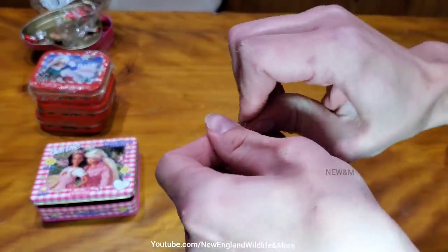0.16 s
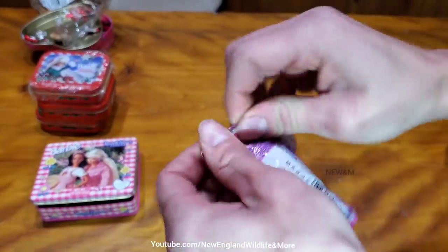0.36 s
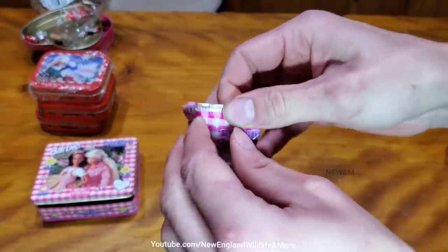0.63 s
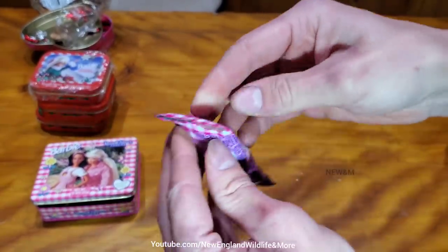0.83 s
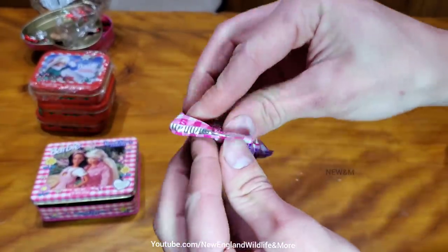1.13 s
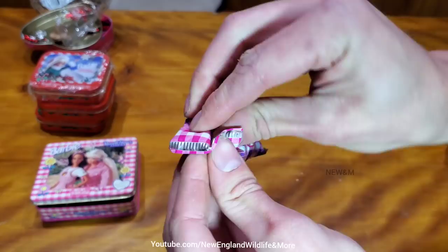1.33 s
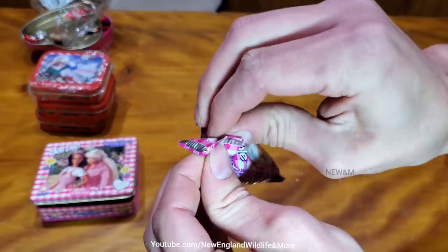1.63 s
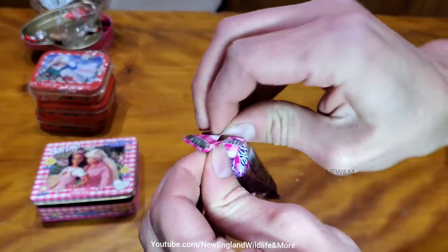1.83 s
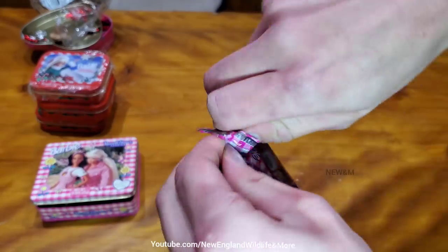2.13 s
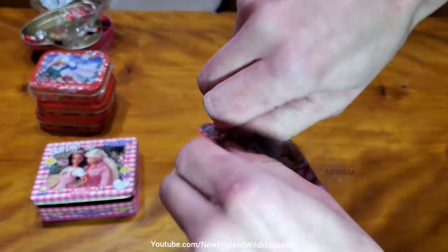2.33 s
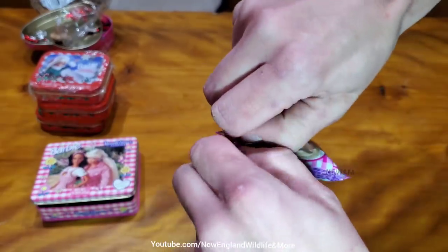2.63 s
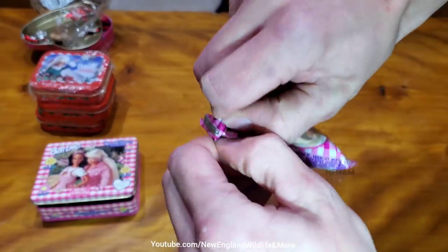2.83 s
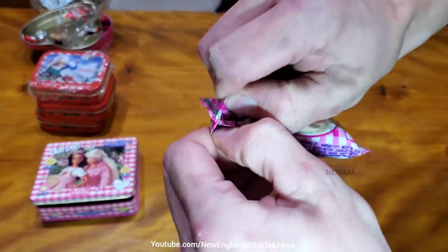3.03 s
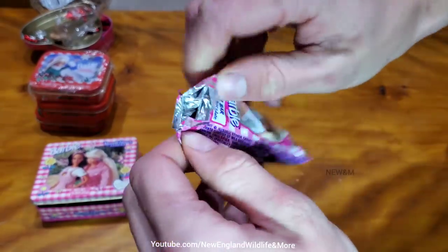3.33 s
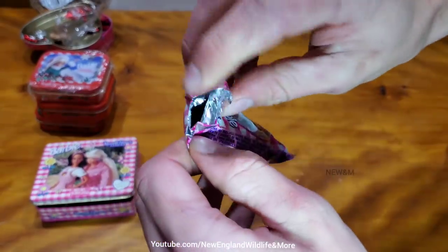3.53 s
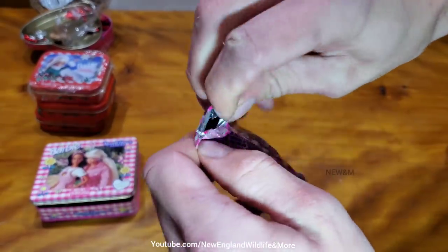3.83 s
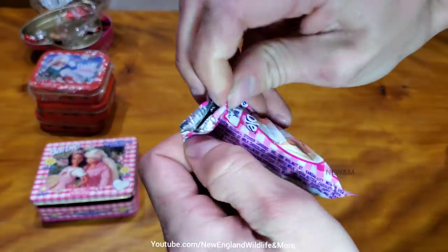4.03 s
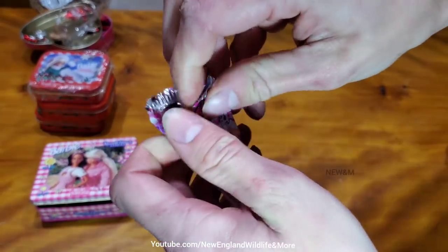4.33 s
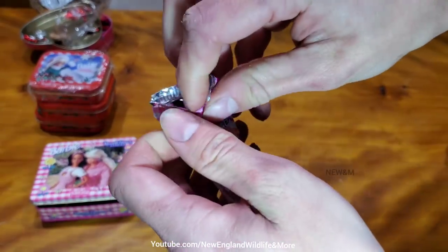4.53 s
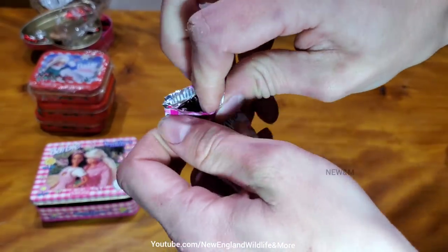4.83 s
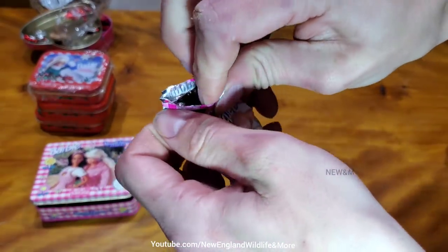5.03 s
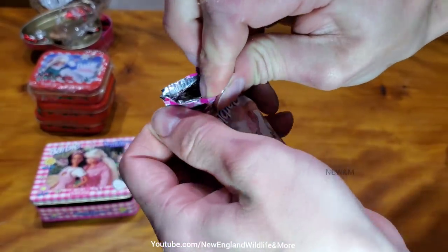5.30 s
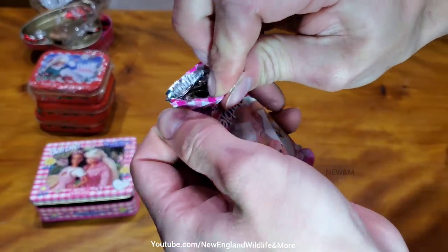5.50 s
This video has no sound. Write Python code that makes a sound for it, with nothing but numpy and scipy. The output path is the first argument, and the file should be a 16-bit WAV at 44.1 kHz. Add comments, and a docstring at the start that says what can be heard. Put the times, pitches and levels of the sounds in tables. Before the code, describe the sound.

Fingers crinkle and tear a foil-lined candy wrapper up close, with dry irregular crackles, a sharp rip midway, then lighter rustling in a quiet room.

```python
"""Over a wooden table in a small quiet room, fingers crinkle and tear a foil-lined candy wrapper near a stereo mic.
Snaps and a dense rustle of small creases share one buckle model: noise bursts (crack, pop, treble) and a damped ring.
Each squeeze drives the rustle and a dull rub of filtered noise; hand bumps on the table are damped 100 Hz sines.
The room answers with decaying noise tails; behind lie shaped room-tone noise, unsteady hum sines and a 57 Hz drone."""
import sys
import numpy as np
from scipy import signal
from scipy.fft import rfft, irfft, next_fast_len
from scipy.io import wavfile
from scipy.ndimage import map_coordinates

SR = 44100
rng = np.random.default_rng(int(sys.argv[2]) if len(sys.argv) > 2 else 0)


def ratio_of_db(decibels):
    """Turn decibels (scalar or array-like) into linear amplitude factors; 0 dB maps to 1."""
    return 10 ** (np.asarray(decibels, float) / 20)


def to_wav(s):
    """Save 16-bit WAV."""
    ch = np.atleast_2d(s).T  # columns
    pcm = np.round(np.clip(ch, -1, 1) * 32767)  # PCM
    wavfile.write(sys.argv[1], SR, pcm.astype(np.int16))


N = 249606

# loud creases: t/s, crack level/dB, panel f/Hz, pop level/dB re crack, treble level/dB re crack
SNAPS = [(.0036,-18.5,1910,-2,-22),(0.0376,-35,2960,-7,-21),(.1621,-47.5,4300,-2.5,1),(.216,-38.5,4400,-15,-26),(0.2295,-40,1930,-3,3.5),(.2403,-36,2020,-7,4.5),
         (.265,-33.5,3060,-28,2.5),(.289,-36.5,3980,-6.5,-7),(0.3777,-36,3040,-4.5,1.5),(0.41,-30,2960,-2,5),(.429,-24.5,1370,-5,-7),(0.5035,-26,1350,-5,-5),
         (0.5115,-26.5,1030,-1,4.5),(.534,-26,2770,-4,3),(0.6326,-24.5,4300,-15,-43),(0.6515,-31,1540,2.5,5),(0.6643,-28.5,3900,-5,-4.5),(0.7015,-34,4200,-6.5,-16),
         (0.7177,-33.5,3400,-7.5,1.5),(0.7456,-31.5,3120,-1.5,-19),(0.767,-25.5,3280,-6,-6),(.77,-26.5,3380,-8,0),(0.7782,-25.5,2080,-19,-6),(0.8018,-23,2010,-10.5,-6),
         (0.8306,-34,3240,-25,-2),(0.8531,-21.5,3870,-12.5,-7.5),(0.8915,-33,1990,1,-16),(.921,-26,3070,-13,-1),(0.9621,-23.5,1800,-5.5,-4),(0.9704,-25,1830,-2,-1.5),
         (0.984,-27.5,2970,-16,-15),(0.9927,-28.5,3230,-8,5.5),(1.0527,-27.5,2970,-7,-3.5),(1.071,-31.5,1800,-2.5,-14),(1.09,-21.5,3450,-8,-5.5),
         (1.1222,-43.5,1650,1,16),(1.1621,-22.5,3030,-19,-9),(1.205,-30.5,3300,-11,2),(1.294,-30,3900,-26,-20),(1.3491,-29.5,3360,-18,-28),
         (1.409,-33,3260,-8.5,-28),(1.4337,-30,1270,-1.5,-4),(1.4431,-28.5,3640,-9,-8),(1.4578,-28.5,3230,-1,-21),(1.5317,-21,3650,-26,-27),
         (1.543,-24,3420,-15.5,-2),(1.5882,-29,1390,-6.5,-8),(1.5947,-25.5,3460,-5.5,-2),(1.6222,-27,3900,-12,-5),(1.636,-24.5,3900,-3,-19),(1.6893,-25.5,2990,-10,-2),
         (1.695,-24,4460,-19.5,3),(1.7718,-45,3570,-3,3),(1.784,-32.5,4300,-16.5,-11),(1.898,-32.5,1710,-5.5,3.5),(1.9279,-30,1060,7.5,-2),(1.9742,-27,3780,-9,-20),(1.993,-22,3360,-20,-15),
         (2.04,-31.5,3260,-9.5,-22),(2.13,-24,3400,-12,-2.5),(2.1669,-29,1790,1,-28),(2.1825,-26.5,3150,-15,-7),(2.272,-35,3130,-4.5,4.5),
         (2.3107,-27,4260,-8.5,-1),(2.315,-33.5,1590,-7,0),(2.3449,-33.5,1600,-4.5,-1.5),(2.4237,-39.5,4420,-9.5,-26),(2.4804,-37.5,3100,-11,-3),(2.605,-46,3630,-37,-27.5),(2.679,-62,3600,-17,-1),(2.733,-24,3600,-7,-34),
         (2.7446,-17,4450,-14.5,-34),(2.818,-21.5,4330,-43,-1.5),(2.855,-25.5,2670,-8,0),(2.8745,-33,4010,-6,3),(2.9339,-41,4170,-22,2),(2.946,-37,4240,-24,10.5),
         (2.9611,-34.5,3930,-18,2),(2.976,-36,4140,-16,5),(2.988,-34,3900,-25,2),(2.999,-18,3150,-23,-8),(3.0022,-34.5,3800,-21,8.5),(3.0107,-35,4100,-26,8),
         (3.0589,-33.5,4440,-6.5,-1),(3.0766,-31,1890,-5,-23),(3.097,-22,1260,-7,3.5),(3.1068,-18,2870,-7,-6),(3.1187,-13.5,4300,-5,-26),
         (3.1242,-16,2280,0,-5),(3.1283,-20.5,1480,-2.5,-1.5),(3.153,-17.5,3600,-13,-22),(3.1963,-20,1996,-10,-3.5),(3.2117,-43,3480,-11,-8),(3.231,-37.5,3250,-5,11.5),
         (3.256,-20,1480,-3,-7),(3.2646,-25.5,3160,-25,-5),(3.3376,-28,4400,-9,-4),(3.378,-41,915,6.5,-10),(3.3949,-27,800,-6,-3.5),(3.4157,-29.5,4000,-16,-5),
         (3.445,-46,900,4,-12),(3.4552,-35.5,3420,-6,-2.5),(3.4744,-28.5,3370,-13,-1.5),(3.51,-38,980,-1.5,-17),(3.5223,-41,1150,0,-10),(3.595,-45,780,-7,-32),(3.6165,-27.5,1360,1,-8),(3.686,-37,1500,0.5,-20),
         (3.7052,-35.5,1280,5,-4),(3.791,-34.5,1750,-3.5,-3),(3.8171,-37.5,3020,-26,3),(3.826,-29,2900,-30,-14),(3.864,-34.5,3060,-25,4.5),(3.876,-30.5,4200,-34,-9),
         (3.888,-25,4000,-13,5.5),(3.915,-36.5,1200,1.5,-8),(3.931,-32,4250,-8,2.5),(3.938,-26,4300,-1.5,-18),(3.944,-24.5,1130,-15.5,-15),(3.9862,-27,1010,-7.5,-7.5),(4.0152,-34,1480,0,-0.5),
         (4.0372,-25.5,4070,-6,0.5),(4.042,-28,3630,-6,-7),(4.052,-29.5,2930,-10,-2.5),(4.1006,-39,1310,6,2),(4.113,-37,3300,-24,11.5),(4.1255,-35,1350,3.5,-1),
         (4.1465,-27.5,3180,-22,5),(4.1503,-29,3260,-6,-8),(4.1672,-24,1690,0.5,-6),(4.1726,-27,2300,-26,-26),(4.212,-33,3220,-16,1),
         (4.235,-26.5,3070,-4,-11),(4.3277,-37.5,3370,-8,-5),(4.3547,-34.5,1940,-12,-20),(4.3656,-40,3750,-1,-5),(4.437,-33,1860,-5,-2.5),(4.5126,-47,1660,3.5,-19),
         (4.553,-37.5,3020,-4,0),(4.615,-33,1370,-4,-13),(4.652,-30.5,3220,-9.5,-3.5),(4.6792,-31.5,1650,-3,0),(4.6859,-32,1040,1,9),(4.7333,-37.5,1330,0,6.5),
         (4.7601,-38.5,1860,7,-9),(4.7642,-40,2900,0,-19),(4.794,-33,3350,-13,6),(4.9054,-43.5,1390,3,5.5),(4.946,-34.5,2210,-20,-9),(4.966,-46.5,710,11,-15),
         (4.9832,-43,3960,-6,8.5),(4.9908,-40,1540,-1,3),(5.0763,-40.5,3860,-15,8),(5.091,-35.5,1580,-6,3.5),(5.1316,-32.5,1860,-5,5.5),(5.1654,-33.5,1900,2.5,3.5),
         (5.2083,-49.5,1410,18.5,-22),(5.2213,-27.5,4070,-5.5,5),(5.238,-34,3600,-4,-20),(5.2835,-26.5,2010,2,-1.5),(5.476,-38,2010,-5.5,-2),
         (5.5945,-48,2710,0,-7),(5.63,-42,1490,6,8.5),(5.6461,-32,1500,-6,-4)]
# finger squeezes: peak t/s, rustle level/dB, fade/(dB/s), foil hiss level/dB re rustle, dull rub level/dB re rustle
SQUEEZES = [(0.0, -45.5, 247, 7.5, -16), (.173, -52.5, 333, -25, -10), (.24, -55, 140, -19, -18),
            (.278, -49.5, 400, 7, -22), (.35, -52, 200, -22, -2), (0.418, -26.5, 171, -9, -8.5),
            (.5, -35.5, 205, -17, -4), (0.546, -27, 410, -10, -12), (0.652, -29.5, 315, -10.5, -8),
            (0.777, -32.5, 420, -7, -4), (.898, -40, 200, -18, -5.5), (0.979, -31, 207, -4.5, -18),
            (1.087, -33, 285, -8, -41), (1.21, -33, 116, -4, -16), (1.31, -43, 124, -5, -12),
            (1.448, -33.5, 146, -8.5, -18), (1.56, -33.5, 102, -3, -31), (1.637, -30.5, 400, -4, -41),
            (1.753, -64, 217, -25, -21), (1.922, -30, 139, -5, -29), (1.999, -36.5, 121, -2, -12),
            (2.14, -41.5, 214, -4.5, -22), (2.186, -31.5, 376, -5, -23), (2.326, -35.5, 266, -2.5, -29),
            (2.44, -50.5, 150, -3, -19), (2.501, -46.5, 208, 0.5, -16), (2.727, -30.5, 153, -5.5, -27),
            (2.841, -37.5, 123, -4.5, -28), (2.95, -51, 128, 8.5, -11), (3.007, -53, 330, -1, -21),
            (3.118, -19, 246, -5, -24), (3.266, -32, 137, -7.5, -20), (3.39, -39.5, 141, -7, -9.5),
            (3.481, -46, 290, -23, -17), (3.632, -45.5, 220, -6, -22), (3.715, -39.5, 208, -9, -6),
            (3.8, -56, 100, 0, -12), (3.93, -30.5, 280, -9, -31), (4.0, -55, 122, 2, -18),
            (4.091, -43, 180, -3, -23), (4.164, -55.5, 142, 10, 9), (4.363, -46, 147, -8.5, -13),
            (4.58, -48, 137, -19, -10), (4.691, -38.5, 140, -16, -12), (4.75, -41, 202, -5, -20),
            (4.804, -44, 320, -16, -5.5), (5.005, -41.5, 376, -3, -19), (5.155, -40.5, 400, -7, -12),
            (5.268, -45, 132, -13, 0), (5.34, -45, 114, -1.5, -23), (5.409, -42.5, 160, 0, -8.5),
            (5.601, -48.5, 120, 3, -22)]
# hand bumps on the table: t/s, level/dB
BUMPS = [(0.765, -40), (1.92, -56), (3.091, -31)]
# crack colour: f/Hz, relative level/dB
CRACK_COLOUR = [(900, -46.5), (1900, -20.5), (2800, 0.5), (3400, 6.5), (4300, 3), (5000, -10.5),
                (7000, -17.5)]
# low pop colour: f/Hz, relative level/dB
POP_COLOUR = [(150, -27), (400, -25), (800, -2.5), (1400, 2.5), (2000, 2.5), (3000, -1.5), (5000, -24)]
# foil treble colour: f/Hz, relative level/dB
TREBLE_COLOUR = [(3500, -17), (5200, -1), (7400, -6.5), (9000, -2), (12500, -4.5), (15500, -9.5),
                 (17000, 0)]
# colour of skin and candy shifting in the hand: f/Hz, relative level/dB
RUB_COLOUR = [(120, -22.5), (250, -1.5), (420, -0.5), (700, -6.5), (1200, -19)]
# room decay: f/Hz, t60/s
ROOM_T60 = [(300, 0.25), (1500, 0.26), (3500, 0.12), (9000, 0.12), (16000, 0.051)]
# appliance hum: f/Hz, level/dB rms before wobble
HUM = [(120, -61), (240, -68.5), (733, -75.5)]
# low drone that swells and sinks: t/s, level/dB rms
DRONE = [(0, -87), (.6, -78), (1.3, -64), (2.5, -65), (3.2, -83), (5.66, -88)]
# room tone colour: f/Hz, relative density/dB per Hz
AIR_COLOUR = [(26, -62), (45, 13.5), (154, 6), (566, -7.5), (818, -1.5), (1180, -62), (1550, -4.5),
              (3660, -39.5), (7290, -50), (9090, -40), (16000, -34)]
# room tone left-right likeness: f/Hz, correlation/1
AIR_ALIKE = [(60, 0.94), (300, 0.58), (2000, 0.096), (8000, .1)]
# lag of the right port: f/Hz, delay/samples
PORT_LAG = [(3000, 1.79), (6000, 2.39), (12000, 0.54)]
# overall band limits, lows fading below 48 Hz and a steep cutoff at 16 kHz: f/Hz, gain/dB
BAND_LIMITS = [(25, -35), (48, -2.5), (15850, 2.5), (16050, -28), (17000, -36)]

LEAD_SAMPLES = 100  # creak before a crease gives way
SNAP_PAN_DB, PAN_SCATTER_DB = -0.5, 4.5  # left re right: mean, scatter
SWELL_DB_PER_S = 469  # build-up of a squeeze
RESTING_RUB_DB = -67.5  # hands at rest, re the squeeze rub scale


def unit(x):
    """Rows scaled to rms 1."""
    return x / np.sqrt(np.mean(x ** 2, axis=-1, keepdims=True) + 1e-20)


def along(points, hz):
    """(Hz, value) points interpolated on a log-frequency axis."""
    f, v = np.transpose(points)
    return np.interp(np.log(hz + 1), np.log(f + 1), v)


def wobble(rate_hz):
    """Smooth random curve with rate_hz knots a second."""
    knots = rng.standard_normal(int(N * rate_hz / SR) + 4)
    return map_coordinates(knots, [np.arange(N) * rate_hz / SR])


def causal(x, colour):
    """x through a minimum-phase filter of energy 1, built by folding the cepstrum."""
    size = 2048
    cepstrum = irfft(np.log(ratio_of_db(along(colour, np.fft.rfftfreq(size, 1 / SR)))))
    cepstrum[1:size // 2] *= 2
    cepstrum[size // 2 + 1:] = 0
    kernel = irfft(np.exp(rfft(cepstrum)))[:x.shape[-1]]
    kernel = kernel / np.linalg.norm(kernel)
    rows = x.reshape(-1, x.shape[-1])
    heard = signal.fftconvolve(rows, kernel[None], axes=-1)
    return heard[:, :x.shape[-1]].reshape(x.shape)


def laid(start_s, shapes):
    """Stereo shapes (2, events, samples) summed at their start times."""
    first = np.round(start_s * SR).astype(int)
    at = (first[:, None] + np.arange(shapes.shape[-1])).ravel()
    return np.array([np.bincount(at, side.ravel(), N + SR)[:N] for side in shapes])


def snaps():
    """Loud creases, each panned to its own spot on the wrapper."""
    pan_db = SNAP_PAN_DB + PAN_SCATTER_DB * rng.standard_normal(len(SNAPS))
    return creases(*np.transpose(SNAPS), pan_db)


def rustle(count=4200):
    """Countless small creases, clumped in time, louder as the fingers press."""
    clumps = np.cumsum(ratio_of_db(4.6 * wobble(45)))
    when = rng.random(count)
    size, pitch, low, high, pan = rng.standard_normal((5, count))
    when_s = np.interp(when, clumps / clumps[-1], np.arange(N) / SR)
    body_db, foil_db, rub_db = pressure(when_s)
    crack_db = body_db - 10.5 + 5.2 * np.clip(size, -3, 2.1)
    panel_hz = np.clip(3200 * np.exp(.25 * pitch), 500, 8000)
    pop_db = -3.5 + 0.34 * (rub_db - body_db) + 4 * low  # more rub, more pop
    treble_db = foil_db - body_db + 4.5 + 3 * high
    return creases(when_s, crack_db, panel_hz, pop_db, treble_db, 3 * pan)


def creases(at_s, crack_db, panel_hz, pop_db, treble_db, pan_db):
    """Each buckle kicks the film: a crack with a ringing panel, a duller pop and a spit of treble."""
    t = (np.arange(400) - LEAD_SAMPLES) / SR
    start_s = np.maximum(at_s - LEAD_SAMPLES / SR, 0)
    haste = np.exp(.3 * rng.standard_normal((len(at_s), 1)))  # some creases give way faster
    side = ratio_of_db(np.array([pan_db, -pan_db]) / 2)[..., None]

    def burst(db, t60_s, alike, colour):
        """Coloured noise bursts at the given levels."""
        noise = bursts(len(at_s), t * haste, 0.0046, t60_s, alike)
        return ratio_of_db(db)[:, None] * unit(causal(noise, colour))

    # heavily damped film
    ring = unit(np.sin(2 * np.pi * panel_hz[:, None] * t) * ratio_of_db(-60 * t / .009) * (t > 0))
    ring_db = crack_db + np.where(panel_hz < 2000, pop_db, 0)  # a low panel belongs to the pop
    panel = side * ratio_of_db(ring_db - 11)[:, None] * ring
    crack = side * burst(crack_db - 9.0, 0.0046, 0.65, CRACK_COLOUR)
    pop = burst(crack_db + pop_db - 6.5, 0.012, 0.89, POP_COLOUR)
    spit = side * burst(crack_db + treble_db - 5.5, 0.007, 0.46, TREBLE_COLOUR)
    return laid(start_s, crack + panel + pop + spit)


def bursts(count, t, rise_s, t60_s, alike):
    """Noise for both ports, partly shared, swelling 60 dB per rise_s up to t = 0, then dying."""
    shared, left, right = np.moveaxis(rng.standard_normal((count, 3, t.shape[-1])), 1, 0)
    share = np.clip(alike, 0, 1)
    pair = np.sqrt(share) * shared + np.sqrt(1 - share) * np.array([left, right])
    return pair * ratio_of_db(np.minimum(60 * t / rise_s, -60 * t / t60_s))


def pressure(t):
    """Rustle, foil hiss and rub in dB at times t: each squeeze swells and fades, and powers add."""
    peak_s, db, fade, foil_db, rub_db = np.transpose(SQUEEZES)[..., None]
    shape_db = db + np.minimum((t - peak_s) * SWELL_DB_PER_S, (peak_s - t) * fade)
    powers = [np.sum(ratio_of_db(2 * (shape_db + extra_db)), axis=0) for extra_db in (0, foil_db, rub_db)]
    return [10 * np.log10(power + 1e-12) for power in powers]


def rub():
    """Dull, lumpy handling noise under the crackle, following the squeezes."""
    grid_s = np.arange(0, N + 100, 100) / SR
    grid_level = np.hypot(ratio_of_db(pressure(grid_s)[2]), ratio_of_db(RESTING_RUB_DB))
    level = np.interp(np.arange(N) / SR, grid_s, grid_level)
    shared, left, right = rng.standard_normal((3, N))
    noise = unit(causal(shared + 0.71 * np.array([left, right]), RUB_COLOUR))
    return noise * level * ratio_of_db(-6.0 + 4.4 * wobble(60))


def bumps():
    """Soft pushes on the table top: a damped 100 Hz sine with a rounded onset."""
    at_s, db = np.transpose(BUMPS)
    t = np.arange(SR // 10) / SR
    push = np.sin(2 * np.pi * 100 * t) * (1 - np.exp(-t / 0.0015)) * ratio_of_db(-60 * t / 0.019)
    return laid(at_s, np.tile(ratio_of_db(db + 10.5)[:, None] * push, (2, 1, 1)))


def room(x, piece=8192):
    """Diffuse answer of the walls: a fresh decaying noise tail for each piece of x."""
    delay = 220  # samples, 5 ms
    out = np.zeros((2, N + SR))
    for start in range(0, N, piece):
        hz, t, z = signal.stft(rng.standard_normal((2, SR // 3)), SR, nperseg=256)
        decay = ratio_of_db(-60 * t / along(ROOM_T60, hz)[:, None])
        tail = signal.istft(z * decay, SR, nperseg=256)[1]
        wet = signal.fftconvolve(x[:, start:start + piece], tail / np.linalg.norm(tail[0]), axes=1)
        out[:, start + delay:][:, :wet.shape[1]] += wet
    return out[:, :N]


def background():
    """Room tone, appliance hum and low drone."""
    t = np.arange(N) / SR
    return room_tone() + hum(t) + drone(t)


def room_tone():
    """Coloured noise split into mid and side to set its left-right likeness."""
    size = next_fast_len(N)
    hz = np.fft.rfftfreq(size, 1 / SR)
    turn = np.arccos(np.clip(along(AIR_ALIKE, hz), -1, 1)) / 2
    shape = ratio_of_db(along(AIR_COLOUR, hz)) * [np.cos(turn), np.sin(turn)]
    mid, side = irfft(rfft(rng.standard_normal((2, size))) * shape, size)[:, :N]
    return ratio_of_db(-62.5) * unit(np.array([mid + side, mid - side]))


def hum(t):
    """Appliance sines, slightly unsteady in level and phase."""
    total = np.zeros(N)
    for f, db in HUM:
        level = np.sqrt(2) * ratio_of_db(db + 1.8 * wobble(30))
        total += level * np.sin(2 * np.pi * f * t + .5 * wobble(10))
    return total


def drone(t):
    """A 57 Hz sine with wandering phase that swells and sinks."""
    level = np.sqrt(2) * ratio_of_db(np.interp(t, *np.transpose(DRONE)))
    return level * np.sin(2 * np.pi * 57 * t + 1.5 * wobble(6.1))


def scene():
    """The wrapper, its echo, the hands and the quiet room."""
    wrapper = snaps() + rustle()
    return wrapper + ratio_of_db(-10.5) * room(wrapper) + rub() + bumps() + background()


def low_pass(x):
    """Removes everything above the highest recorded frequency."""
    return signal.sosfilt(signal.butter(12, 17000, fs=SR, output="sos"), x)


def record(dry):
    """Sound reaches the right port a little later; lows fade below 48 Hz, a steep cutoff ends the top at 16 kHz."""
    size = next_fast_len(N)
    hz = np.fft.rfftfreq(size, 1 / SR)
    # half the lag each way: left early, right late
    delay = np.exp(1j * np.pi * hz / SR * along(PORT_LAG, hz) * [[1], [-1]])
    heard = irfft(rfft(dry, size) * delay * ratio_of_db(along(BAND_LIMITS, hz)), size)[:, :N]
    return low_pass(heard)


dry = scene()
out = record(dry)
to_wav(out)
```